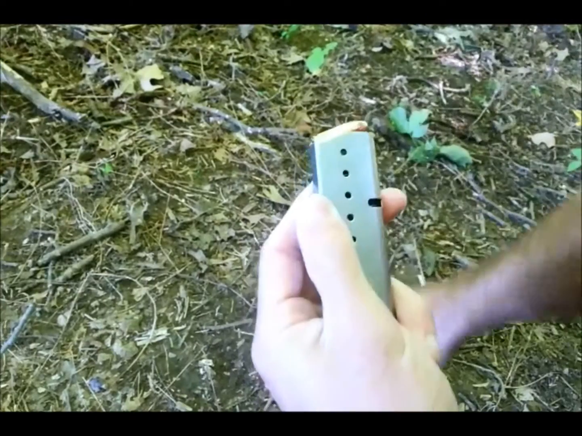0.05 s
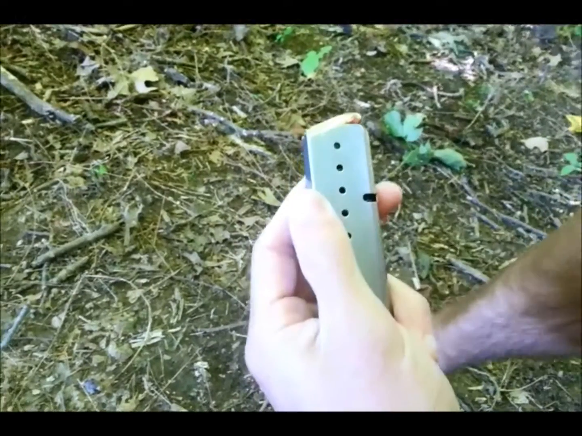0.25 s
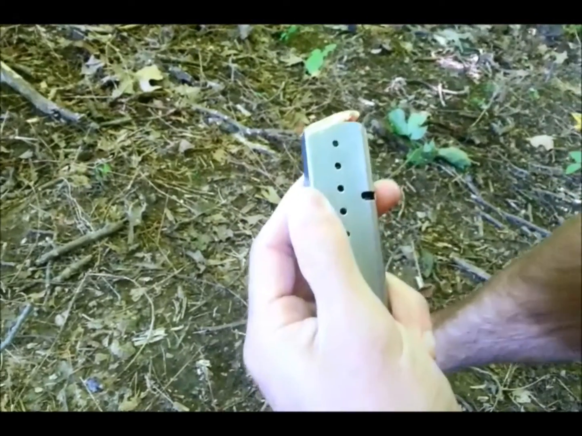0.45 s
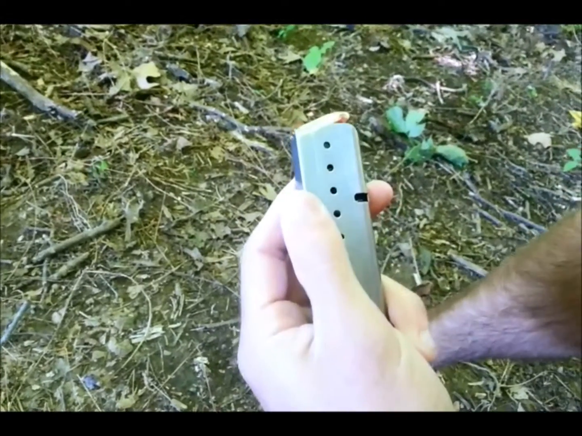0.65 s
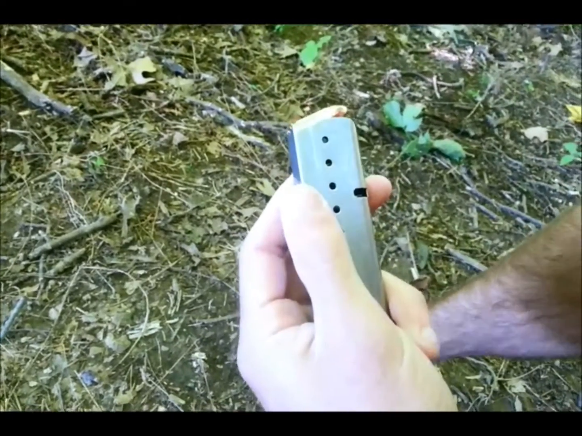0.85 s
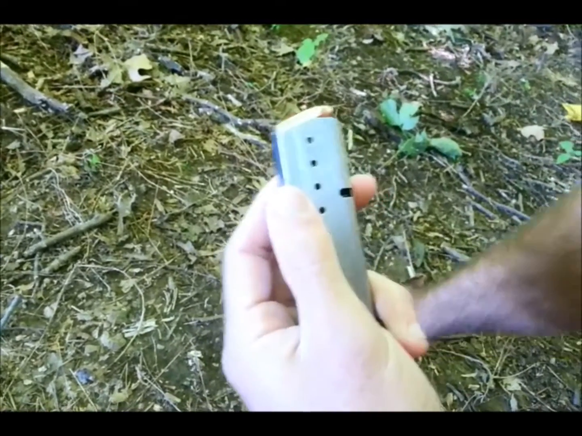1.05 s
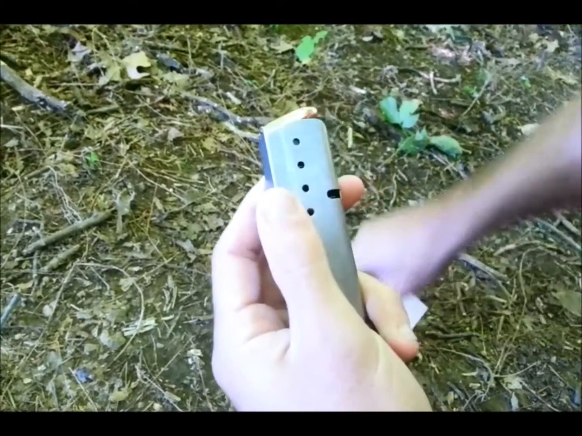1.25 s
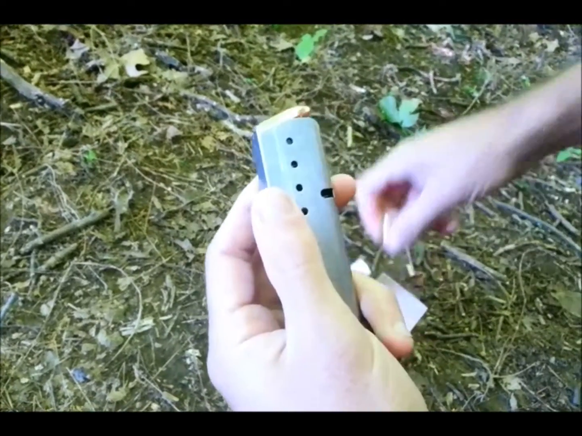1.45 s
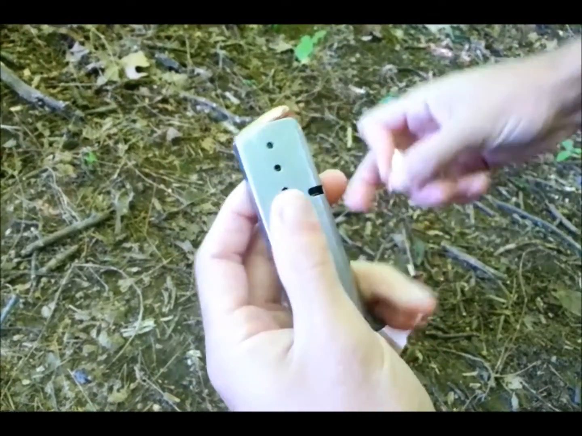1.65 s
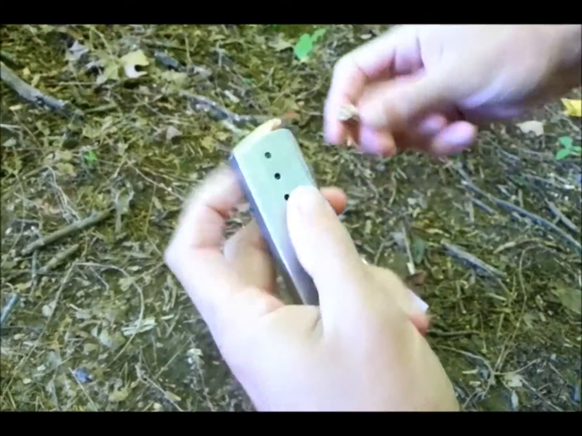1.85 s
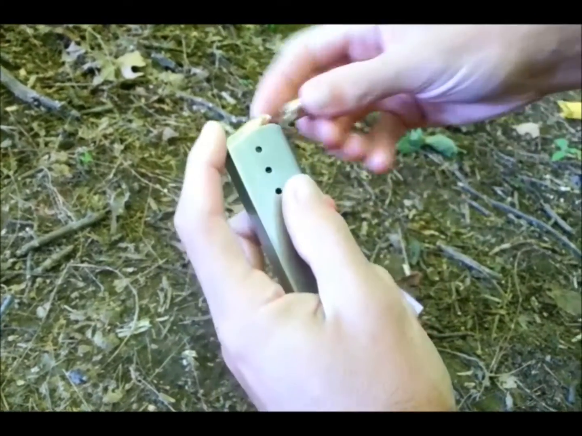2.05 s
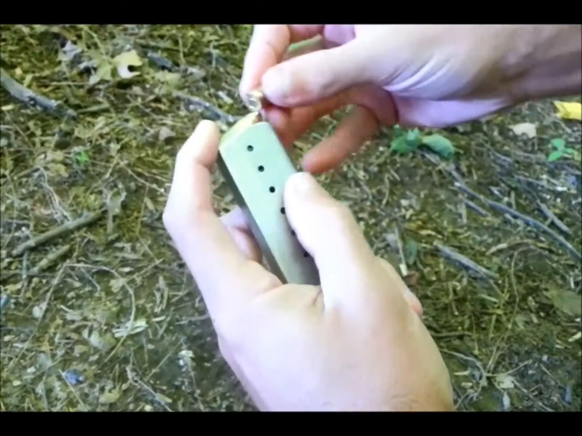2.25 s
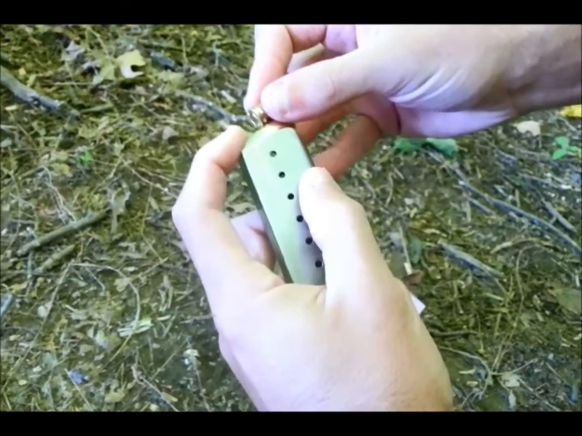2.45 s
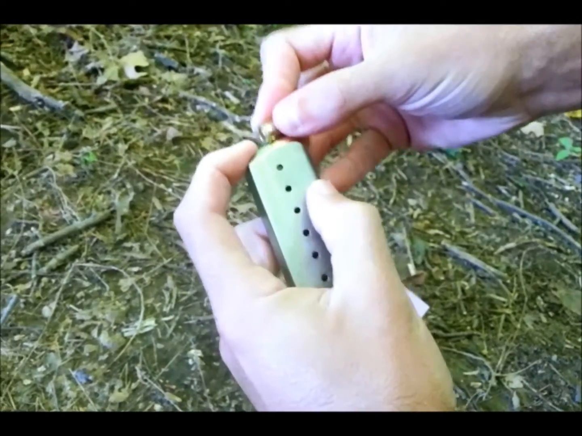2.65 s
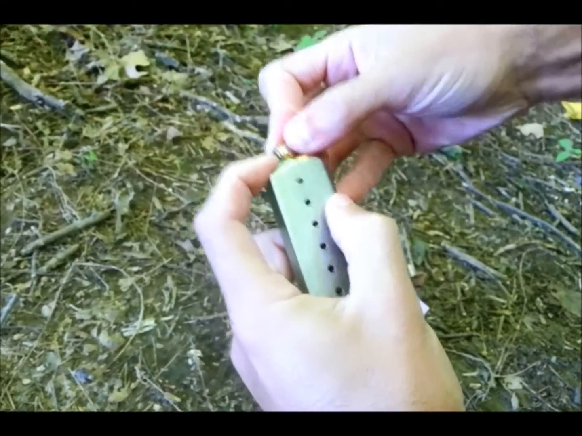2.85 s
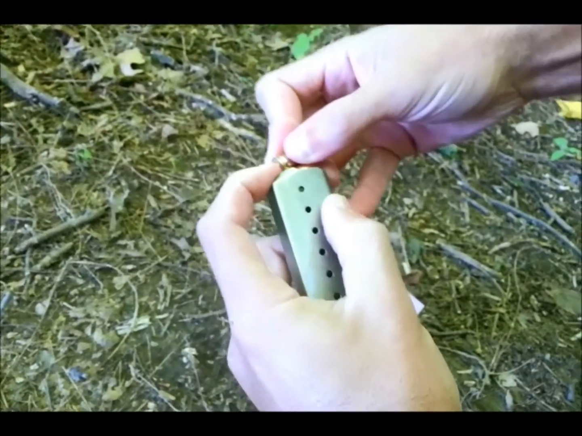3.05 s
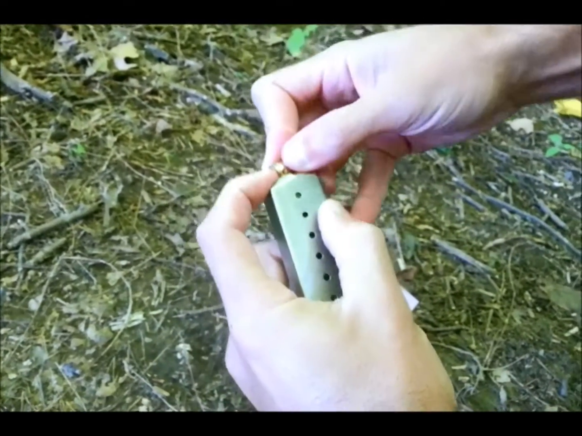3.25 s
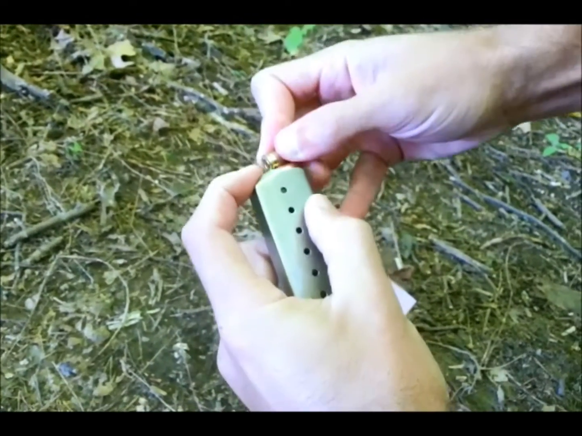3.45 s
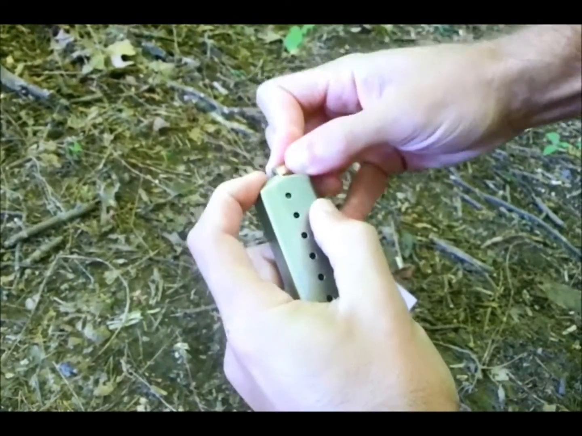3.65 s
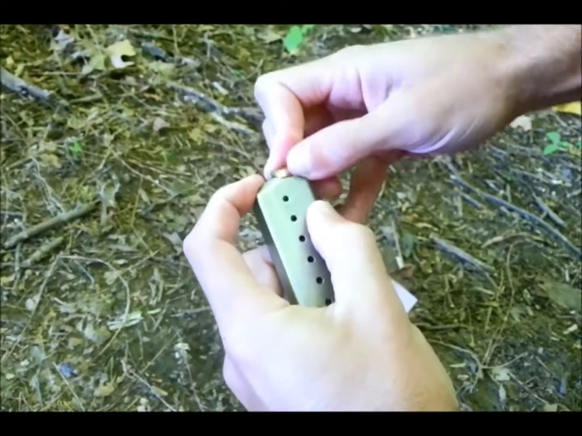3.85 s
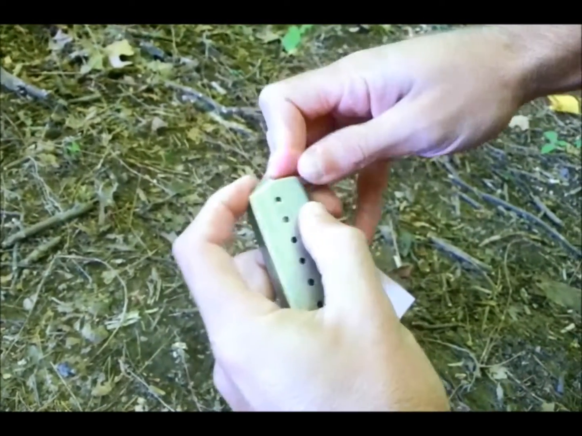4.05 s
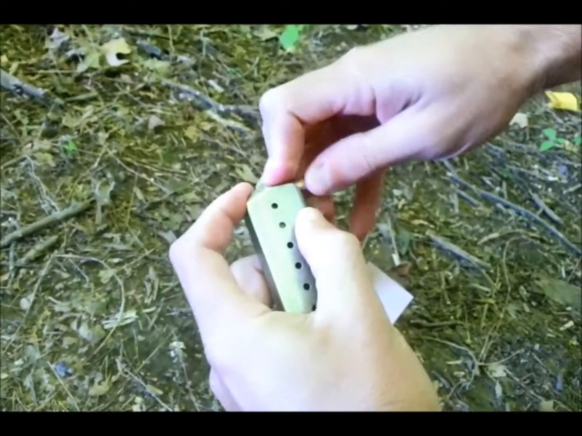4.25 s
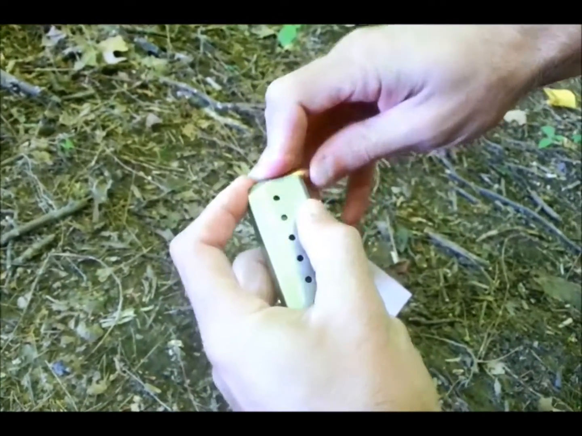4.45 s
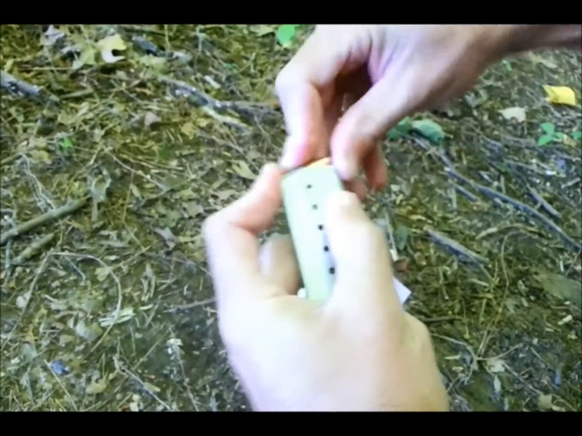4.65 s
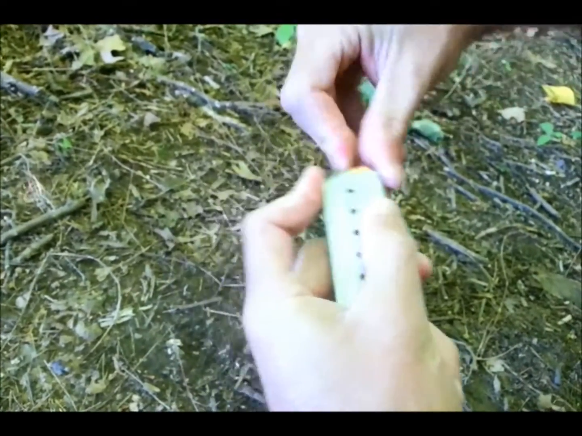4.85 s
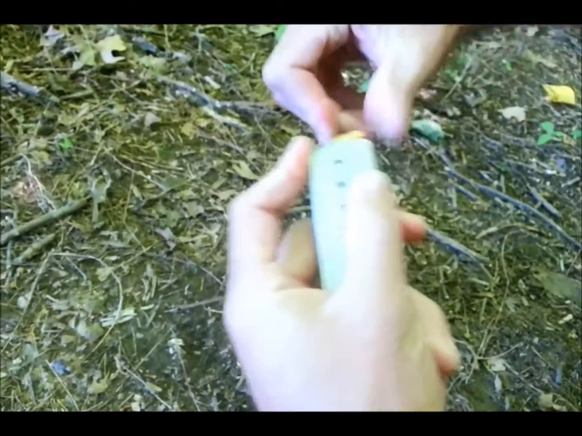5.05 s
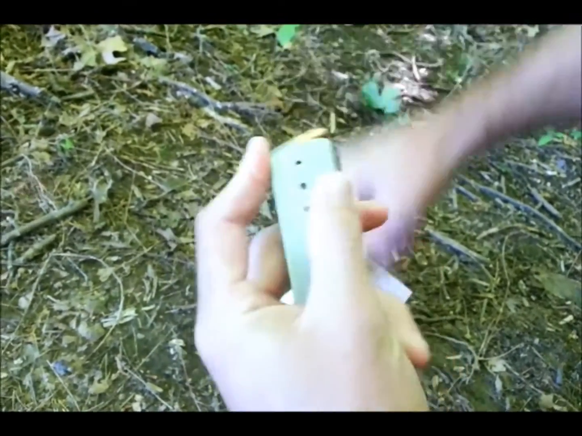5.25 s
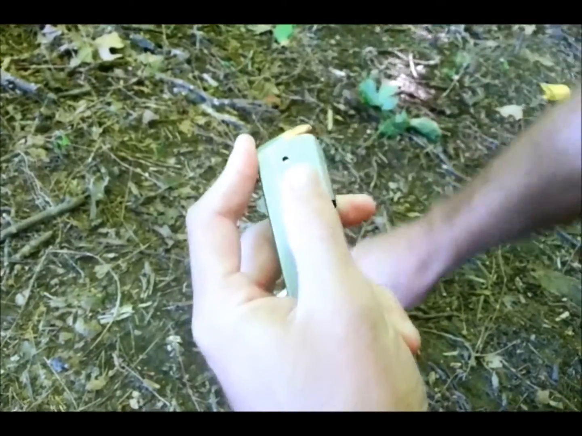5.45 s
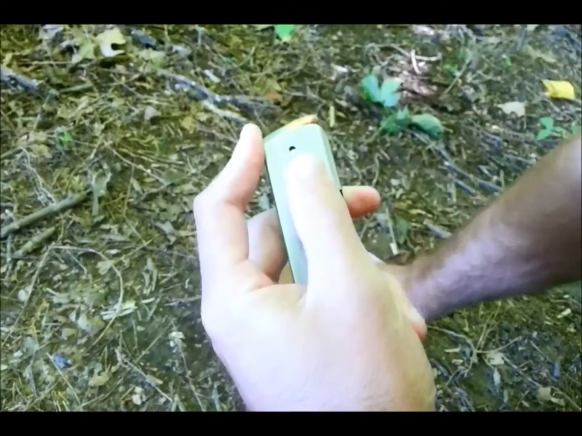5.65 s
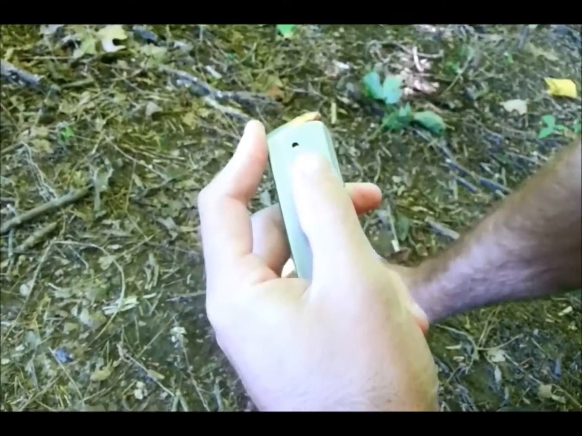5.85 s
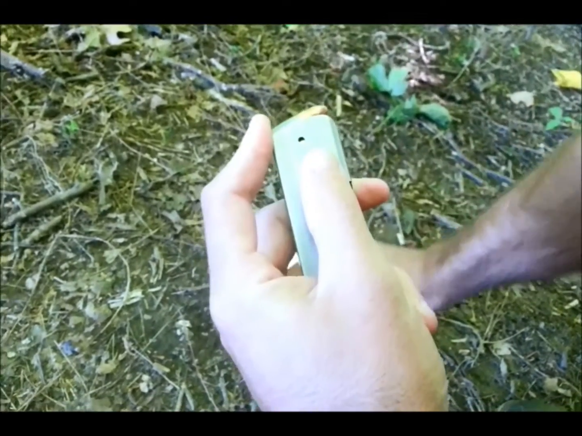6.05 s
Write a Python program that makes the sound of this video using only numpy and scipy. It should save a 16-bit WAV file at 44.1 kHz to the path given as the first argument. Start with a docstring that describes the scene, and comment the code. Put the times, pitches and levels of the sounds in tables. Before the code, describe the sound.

Hands rummage in a cardboard box of cartridges, then a round clicks and snaps into a steel pistol magazine, over softly hissing leaves.

```python
"""Leaves hiss steadily in a wood while, close by, a hand rummages in a cardboard box of cartridges.
From 2.3 s a brass round clicks against a steel pistol magazine. At 3.7 s it snaps under the feed lips
(the edges that hold it in), loud enough to overload the microphones, and small clicks nudge it home.
A faint bird calls, and at 5.6 s the hand goes back to the box. The trees give each touch a short echo."""
import sys
import numpy as np
from scipy import signal
from scipy.fft import rfft, irfft, next_fast_len
from scipy.io import wavfile
from scipy.ndimage import map_coordinates

SR = 44100
rng = np.random.default_rng(int(sys.argv[2]) if len(sys.argv) > 2 else 0)


def inscribe(sig):
    """Save sig as 16-bit PCM at rate SR to the path in sys.argv[1].

    A 1-D sig is mono; a 2-D sig holds one channel per row.
    Samples are clipped to [-1, 1] before scaling.
    """
    pcm = np.round(np.clip(np.atleast_2d(sig).T, -1, 1) * 32767)
    wavfile.write(sys.argv[1], SR, pcm.astype(np.int16))


N = 269010
SCENE_S = np.arange(N) / SR  # clock for the whole scene
HIT_S = np.arange(8192) / SR  # clock for one short sound


def amp(db):
    """Turn decibels into a gain."""
    return 10 ** (np.asarray(db) / 20)

def unit(x):
    """Scale a signal to an average (rms) level of 1."""
    return x / np.sqrt(np.mean(x ** 2) + 1e-20)

def along(points, hz):
    """Read between (pitch_hz, value) points on a log pitch scale."""
    pitches, values = np.transpose(points)
    return np.interp(np.log(hz + 1), np.log(pitches + 1), values)

def wobble(per_s):
    """A smooth curve through per_s random values a second."""
    values = rng.standard_normal(int(N * per_s / SR) + 4)
    return map_coordinates(values, [SCENE_S * per_s])

def filtered(x, response):
    """Multiply each frequency of x by response(hz)."""
    length = x.shape[-1]
    padded = next_fast_len(length + len(HIT_S))
    return irfft(rfft(x, padded) * response(np.fft.rfftfreq(padded, 1 / SR)), padded)[..., :length]

def stereo_noise(length, colour, likeness):
    """Noise shaped by colour(hz); likeness 1 makes left and right the same, 0 unrelated."""
    def blend(hz):
        angle = np.arccos(np.clip(along(likeness, hz), -1, 1)) / 2
        return colour(hz) * [np.cos(angle), np.sin(angle)]
    mid, side = filtered(rng.standard_normal((2, length)), blend)
    return unit(np.array([mid + side, mid - side]))

def leaning(x, balance):
    """Make each frequency louder on one side."""
    return filtered(x, lambda hz: amp(np.outer([.5, -.5], along(balance, hz))))

def delayed(x, ms):
    """The left microphone hears the sound ms later than the right."""
    return filtered(x, lambda hz: np.exp(np.outer([-1j, 1j], np.pi * hz * ms / 1000)))

def add(track, start_s, sound):
    """Mix a sound into the track."""
    part = track[:, max(round(start_s * SR), 0):][:, :sound.shape[1]]
    part += sound[:, :part.shape[1]]

def fade(fade_s, rise_s, hold_s=0):
    """Rise quickly, hold, then fall by 60 dB in fade_s."""
    rise = 1 - np.exp(-HIT_S / rise_s)
    shape = rise * np.exp(-np.log(1000) * np.maximum(HIT_S - hold_s, 0) / max(fade_s, .004))
    return shape / shape.max()

def tone(hz):
    """A pure note that starts anywhere in its wave."""
    return np.sin(2 * np.pi * (hz * HIT_S + rng.random()))

def struck(ring, fade_s, rise_s, hold_s=0):
    """Fade a noisy ring without letting chance change its energy."""
    shape = fade(fade_s, rise_s, hold_s)
    return unit(ring * shape) * np.sqrt(np.mean(shape ** 2) * np.mean(ring ** 2))

def crack(colour, likeness, bass_db, treble_db):
    """The noise of one touch, with its bass and treble each set against the middle."""
    def three_bands(hz):
        low = 1 / (1 + (hz / 1500) ** 8)
        high = 1 - 1 / (1 + (hz / 5500) ** 12)
        bass, middle, treble = [unit(colour(hz) * band) for band in (low, 1 - low - high, high)]
        return amp(bass_db) * bass + middle + amp(treble_db) * treble
    power = 1 + amp(bass_db) ** 2 + amp(treble_db) ** 2
    return np.sqrt(power) * stereo_noise(len(HIT_S), three_bands, likeness)

def clarity(bass_db):
    """Gain of the clear note: brass on metal rings out, dull knocks hardly do."""
    return amp(0.5 - 0.36 * (max(bass_db, -30) + 20))


# How loud the wood is over time: time_s, murmur_db, leaves_db
WOOD_LEVELS = [(0, -55, -49.5), (1.55, -58, -52), (2.1, -59, -52.5), (3.2, -58, -51), (4.8, -58, -49),
               (5.55, -58, -47.5), (6.1, -56, -50)]
# Tone colour of the air's low murmur: pitch_hz, level_db
MURMUR_COLOUR = [(15, -51), (25, -18), (199, 0.5), (360, -1.5), (533, -3.5), (594, -3.5), (749, -5),
                 (819, -5.5), (880, -6), (1800, -12), (2340, -26), (3960, -120)]
# Tone colour of the hissing leaves: pitch_hz, level_db
LEAF_COLOUR = [(710, -16.5), (1200, -11.5), (1480, -11), (2010, -7), (2440, -3.5), (2920, -2.5), (3210, 1),
               (3640, 1.5), (4130, 0), (5210, -5.5), (5670, -9), (7710, -13.5), (13900, -18.5),
               (15000, -22)]
# How alike the wood sounds on both sides: pitch_hz, likeness
WOOD_LIKENESS = [(100, 0.12), (400, 0.21), (1300, -0.052), (3000, -0.12), (6000, 0.025)]
# Which side the wood is louder on: pitch_hz, left_minus_right_db
WOOD_BALANCE = [(60, 2), (250, 1.5), (1200, 0.5), (3500, -2.5), (6500, -5.5), (8500, 0.5), (14000, 4)]
# Thin notes of a far bird: middle_s, pitch_hz, level_db
BIRD_NOTES = [(2.77, 7900, -64), (5.22, 8400, -71), (5.30, 8000, -62), (5.39, 7000, -59)]

def wood():
    """Air murmurs, leaves hiss and a bird gives a few thin notes."""
    def bed(colour, level_db):
        return amp(level_db) * stereo_noise(N, lambda hz: amp(along(colour, hz)), WOOD_LIKENESS)
    time_s, murmur_db, leaves_db = np.transpose(WOOD_LEVELS)
    air = bed(MURMUR_COLOUR, np.interp(SCENE_S, time_s, murmur_db) + 0.21 * wobble(6.3))
    air += bed(LEAF_COLOUR, np.interp(SCENE_S, time_s, leaves_db) + 0.1 * wobble(8.8))
    for middle_s, pitch_hz, level_db in BIRD_NOTES:
        noise = rng.standard_normal((2, N))
        note = unit(filtered(noise, lambda hz: np.exp(-((hz - pitch_hz) / 260) ** 2)))
        air += amp(level_db) * note * np.exp(-((SCENE_S - middle_s) / 0.051) ** 2)
    return leaning(air, WOOD_BALANCE)


# How long the echo takes to fall by 60 dB: pitch_hz, fade_s
ECHO_FADES = [(200, .2), (1500, 0.45), (3500, 0.54), (8000, 0.29), (14000, 0.76)]

def tree_echo(near):
    """Ground and trees scatter the sound back; the nearest trunks answer together."""
    hz, time_s, noise = signal.stft(rng.standard_normal((2, SR // 2)), SR, nperseg=256)
    trunks_db = 7 * np.exp(-((time_s - .043) / 0.011) ** 2)
    fallen_db = 60 * time_s / along(ECHO_FADES, hz)[:, None]
    tail = signal.istft(noise * amp(trunks_db - fallen_db), SR, nperseg=256)[1]
    return signal.fftconvolve(near[1][None], tail / np.linalg.norm(tail[0]), axes=1)[:, :N]


# How alike the box and hands sound on both sides: pitch_hz, likeness
BOX_LIKENESS = [(300, 0.4), (1000, 0.61), (2200, 0.69), (4200, 0.33), (10000, 0.056)]
# Soft bumps of the hands: start_s, level_db
HAND_BUMPS = [(0.06, -55), (0.229, -56), (0.468, -44), (1.043, -66), (1.217, -43), (5.645, -48.5)]

def hand_bumps(pitch_hz=306):
    """A soft hand meets the box with a dull thud."""
    out = np.zeros((2, N))
    dull = lambda hz: np.exp(-(np.log((hz + 1) / pitch_hz) / 0.75) ** 2)
    for start_s, level_db in HAND_BUMPS:
        thud = stereo_noise(len(HIT_S), dull, BOX_LIKENESS)
        add(out, start_s, amp(level_db) * struck(thud, fade_s=0.044, rise_s=0.0013))
    return out


# Tone colour of the cardboard: pitch_hz, level_db
CARDBOARD_COLOUR = [(59, -59), (100, -61), (252, -11), (434, -21.5), (620, -5.5), (814, -17.5),
                    (1110, -3.5), (1240, -2.5), (1660, -6.5), (2180, -1), (3680, -0.5), (4540, 0.5),
                    (5150, -7), (9660, -22), (15000, -58)]
# Pitches that the hollow box boosts: pitch_hz, width_hz, boost_db
HOLLOW_PEAKS = [(1028, 160, 8), (2000, 680, 5), (4150, 760, 0.5)]

def cardboard(hz):
    """Gain of the box at each pitch: its broad colour plus the peaks of its hollow."""
    hollow_db = sum(boost_db / (1 + (2 * (hz - pitch_hz) / width_hz) ** 2)
                    for pitch_hz, width_hz, boost_db in HOLLOW_PEAKS)
    return amp(along(CARDBOARD_COLOUR, hz) + hollow_db)

def clinks(per_s=220, middle_hz=2940, span_octaves=1.536):
    """Loose rounds jostle: tiny brass notes at random times, pitches and strengths."""
    out = np.zeros((2, N))
    shape = fade(fade_s=0.011, rise_s=0.0004)[:SR // 40]
    for when, pitch, softness, *phases in rng.random((int(per_s * N / SR), 5)):
        hz = middle_hz * 2 ** (span_octaves * (pitch - .5))
        note = np.sin(2 * np.pi * np.add.outer(phases, hz * HIT_S[:len(shape)]))
        add(out, when * N / SR, amp(-14 * softness) * shape * note)
    return unit(out)

def swell(start_s, length_s, level_db, rise_s=0.0016, release_s=0.011):
    """The loudness of one hand movement: it rises, holds and dies away."""
    rise = np.clip((SCENE_S - start_s) / rise_s, 0, 1)
    return amp(level_db) * rise * np.exp(-np.maximum(SCENE_S - start_s - length_s, 0) / release_s)


# Fingers pushing through the box: start_s, length_s, level_db, crackle_db (added to level_db)
FINGER_PUSHES = [(0.208, 0.04, -30.5, -11), (0.269, 0.039, -38.5, -18), (0.35, 0.028, -46, -11),
                 (0.413, 0.077, -39, -20), (0.46, 0.027, -29.5, -15), (0.495, 0.078, -40, -20),
                 (0.587, 0.038, -41.5, -15), (0.883, 0.065, -45.5, -22), (0.992, 0.025, -42, -18),
                 (1.024, 0.043, -30, -8.5), (1.323, 0.03, -49, -4), (5.649, 0.02, -40.5, -9),
                 (5.694, 0.026, -43, -11), (5.783, 0.018, -31, -11.5), (5.814, 0.042, -42.5, -6),
                 (6.013, 0.0077, -38.5, -12), (6.091, 0.03, -29.5, -5)]
# The hand brushing the box all the while: start_s, length_s, level_db
HAND_BRUSHES = [(0.19, 0.99, -50), (5.645, 0.52, -46)]

def rummage(slips_per_s=370, crackle_above_hz=6300):
    """Fingers and rounds catch and slip on cardboard, so each push rustles, crackles and clinks."""
    slips = (rng.random(N) < slips_per_s / SR) * amp(-2 * np.minimum(rng.exponential(size=N), 3))
    slip_energy = signal.fftconvolve(slips, fade(fade_s=0.017, rise_s=0.00044) ** 2)[:N]
    roughness = unit(np.sqrt(np.abs(slip_energy)))
    effort = sum(swell(*move[:3]) for move in [*FINGER_PUSHES, *HAND_BRUSHES])
    grip = sum(swell(start_s, length_s, level_db + crackle_db)
               for start_s, length_s, level_db, crackle_db in FINGER_PUSHES)
    bright = lambda hz: cardboard(hz) * (1 - 1 / (1 + (hz / crackle_above_hz) ** 6))
    rustle = stereo_noise(N, cardboard, BOX_LIKENESS)
    crackle = stereo_noise(N, bright, BOX_LIKENESS)
    return roughness * (effort * rustle + grip * crackle) + amp(-3.5) * effort * clinks()


# Rounds knocking in the box: start_s, level_db, bass_db, treble_db, pitch_hz
ROUND_KNOCKS = [(0.0612, -25.5, -2.5, -12, 2340), (0.1924, -20.5, -20, -12, 3700),
                (0.199, -21.5, -23, -15, 4040), (0.208, -18, -17, 1, 4310), (0.2312, -12.5, -8, -14, 1940),
                (0.2825, -16.5, -4, -10.5, 3070), (0.405, -23, -19, -15, 1990),
                (0.4293, -19, -15, -15, 2460), (0.4573, -18, -5, -21, 2470), (0.474, -7, -13.5, -12, 4490),
                (0.532, -21, -18, -20, 3580), (0.5443, -16, -22, -27, 2430),
                (0.5896, -14.5, -23, -18, 2380), (0.6417, -17, -19, -25, 2460),
                (0.644, -9.5, -12, -11, 4600), (0.6812, -20.5, -10.5, -18, 4230),
                (0.6928, -19.5, -11, -21, 3060), (0.7849, -22.5, -16, -35, 2060),
                (0.8835, -28.5, -23, -30, 1980), (0.899, -20, -17, -35, 2400), (0.9361, -18, -6, -7, 2080),
                (1.011, -12, -17, -3, 2350), (1.0275, -11.5, -15, -20, 4300), (1.042, -10, -14, -9, 4700),
                (1.176, -16.5, -18.5, -11, 3370), (1.183, -24.5, -14, -26, 2770),
                (5.757, -13, -25, -16, 2680), (5.7886, -14, -21, -11, 3450), (5.8443, -25, -24, -9, 2930),
                (5.851, -16, -33, -11, 2960), (5.965, -22, -17, -11, 2650), (6.006, -18.5, -34, -17, 4270),
                (6.0248, -23.5, -19, -15, 4600), (6.085, -15.5, -11.5, 1, 2170)]

def knocks():
    """Rounds hit and scrape for a moment with a brass note, then the cardboard quiets them."""
    out = np.zeros((2, N))
    for start_s, level_db, bass_db, treble_db, pitch_hz in ROUND_KNOCKS:
        hardness = 0.23 * max(treble_db + 19, 0)  # a briefer touch reaches higher pitches
        colour = lambda hz: cardboard(hz) * np.maximum(hz / 8500, 1) ** hardness
        ring = crack(colour, BOX_LIKENESS, bass_db, treble_db) + clarity(bass_db) * tone(pitch_hz)
        knock = struck(ring, fade_s=0.025, rise_s=0.00042, hold_s=0.0021)
        add(out, start_s, amp(level_db - 10) * knock)
    return out


# Tone colour of a hit on the magazine: pitch_hz, level_db
MAGAZINE_COLOUR = [(200, -34), (1100, -25), (1550, -8), (2100, -14.5), (2700, 7), (3200, -0.5), (3900, 5),
                   (4700, 0.5), (5500, -11), (6400, -6), (7700, -12.5), (10500, -12), (15000, -42.5)]
# How alike that hit sounds on both sides: pitch_hz, likeness
MAGAZINE_LIKENESS = [(300, 0.97), (3200, 0.53), (6000, 0.077), (12000, 0.22)]

def steel_crack(bass_db, treble_db, edge_hz=2750):
    """The magazine's many crowded notes blur into noise, weaker below a sharp edge in pitch."""
    colour = lambda hz: amp(along(MAGAZINE_COLOUR, hz) - 10 / (1 + (hz / edge_hz) ** 20))
    return crack(colour, MAGAZINE_LIKENESS, bass_db, treble_db)


# Clear notes of the magazine's steel tube: pitch_hz, level_db
MAGAZINE_NOTES = [(2660, -6), (2890, -9.5), (3080, -1), (3180, -11.5), (3358, -3), (3522, -14), (3870, -5),
                  (4188, -10), (4812, -3), (5965, -14), (6300, -16), (6520, -16), (8592, -14), (9143, -18),
                  (10590, -21)]
TUBE_HZ = 1540  # its lowest note, heard when a round presses against it

def magazine_ring(fade_s):
    """The tube rings briefly in the hand, its notes at new strengths for each hit."""
    ring = sum(amp(level_db + rng.normal(0, 1.9)) * tone(hz) for hz, level_db in MAGAZINE_NOTES)
    return ring * fade(fade_s, rise_s=0.00008)


# Brass touching the magazine: start_s, level_db, treble_db, pitch_hz, second_pitch_hz, fade_s
BRASS_CLICKS = [(2.3348, -16, -14, 3710, 6100, 0.018), (2.3412, -21.5, -35, 3260, 3650, 0.054),
                (2.357, -26.5, -20, 3280, 4060, 0.092), (2.3902, -32, -13, 3340, 4130, 0.07),
                (2.7546, -32, -15, 3370, 2720, 0.037), (2.8983, -23, -15, 3520, 2550, 0.025),
                (3.9793, -26.5, -12, 3020, 4150, 0.11), (3.9857, -18.5, -15.5, 3150, 3700, 0.11),
                (4.0107, -19, -1, 3420, 6950, 0.025), (4.0402, -26, -32, 3190, 4130, 0.13),
                (4.095, -24.5, -1.5, 2980, 6240, 0.028), (4.108, -23, -11, 3080, 2750, 0.058),
                (4.2245, -31.5, -10.5, 3380, 4170, 0.083), (4.6278, -28, -6, 3930, 3220, 0.03),
                (5.1177, -19, -28, 4200, 3800, 0.012), (5.128, -21, -28, 3110, 4300, 0.026)]
# Where the touches seem to come from: time_s, left_delay_ms
CLICK_DIRECTIONS = [(2.4, -0.2), (2.75, 0.1), (4.2, 0.14), (4.63, 0.066), (5.12, -0.24)]

def clicks():
    """The round taps the feed lips, ringing two notes of its brass case and, faintly, the tube."""
    out = np.zeros((2, N))
    for start_s, level_db, treble_db, pitch_hz, second_pitch_hz, fade_s in BRASS_CLICKS:
        bass_db = -15 + 0.36 * treble_db  # a harder touch has more bass as well as more treble
        touch = struck(steel_crack(bass_db, treble_db), 0.65 * fade_s, rise_s=0.00071, hold_s=0.001)
        notes = tone(pitch_hz) + amp(-9) * tone(second_pitch_hz)
        case = amp(2) * clarity(bass_db) * notes * fade(fade_s, rise_s=0.0004)
        tube = amp(-14) * magazine_ring(fade_s)
        tube += amp(-21) * tone(TUBE_HZ) * fade(fade_s, rise_s=0.0019)
        delay_ms = np.interp(start_s, *np.transpose(CLICK_DIRECTIONS))
        add(out, start_s, amp(level_db - 9) * delayed(touch + case + tube, delay_ms))
    return out

def snap(case_hz=3069):
    """The spring drives the round against the lips: a slip, a hard crack, then case and tube ring."""
    out = np.zeros((2, N))
    slip = struck(steel_crack(bass_db=-14, treble_db=-3), fade_s=0.053, rise_s=0.0008)
    add(out, 3.7108, amp(-25) * slip)
    blow = struck(steel_crack(bass_db=-41, treble_db=-6.5), fade_s=0.03, rise_s=0.0008, hold_s=0.0021)
    case = amp(-8) * tone(case_hz) * fade(fade_s=0.027, rise_s=0.0012)
    tube = amp(-7.5) * magazine_ring(fade_s=0.04)
    tube += amp(-21.5) * tone(TUBE_HZ) * fade(fade_s=0.021, rise_s=0.0014)
    add(out, 3.7127, amp(-0.96) * blow + case + tube)
    return delayed(out, ms=0.106)


# Which side the close sounds are louder on: pitch_hz, left_minus_right_db
NEAR_BALANCE = [(200, -3), (1100, -1.5), (2700, -5), (4200, -2.5), (6500, -7.5), (9500, -4.5),
                (13500, -3.5)]

def scene():
    """Hands work just in front of the microphones, with the wood all around."""
    near = leaning(knocks() + rummage() + clicks() + snap() + hand_bumps(), NEAR_BALANCE)
    return near + amp(-24.5) * tree_echo(near) + wood()

def record(dry):
    """The microphones overload on the snap, and the very highest treble is cut off."""
    top_hz = 14700
    overloaded = np.clip(dry, -1, 1)
    return filtered(overloaded, lambda hz: 1 / (1 + (hz / top_hz) ** 120))


dry = scene()
out = record(dry)
inscribe(out)
```